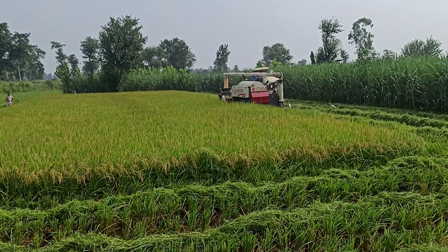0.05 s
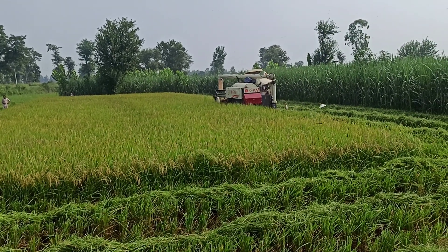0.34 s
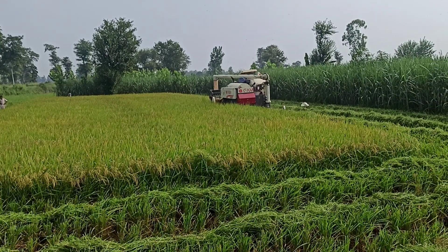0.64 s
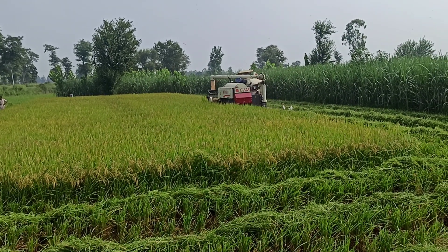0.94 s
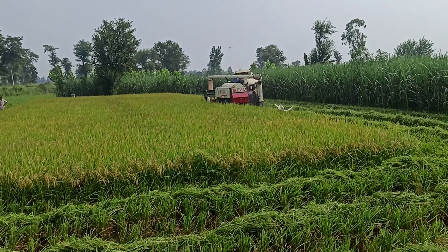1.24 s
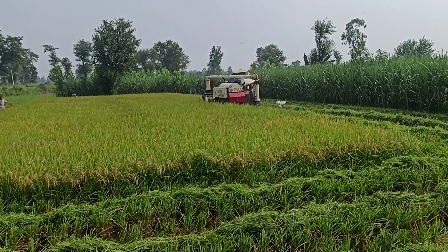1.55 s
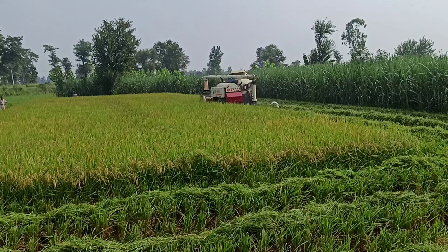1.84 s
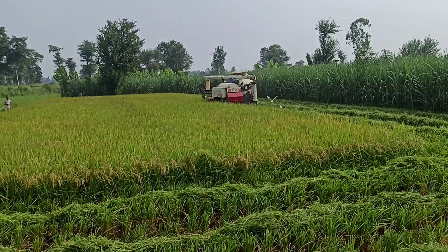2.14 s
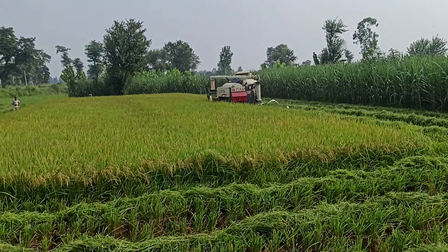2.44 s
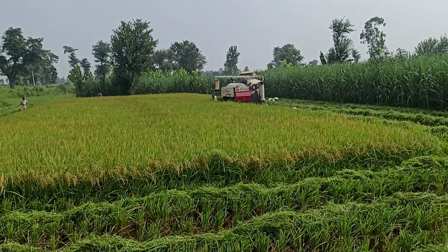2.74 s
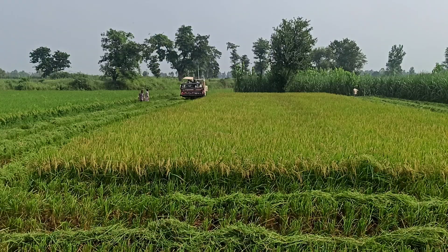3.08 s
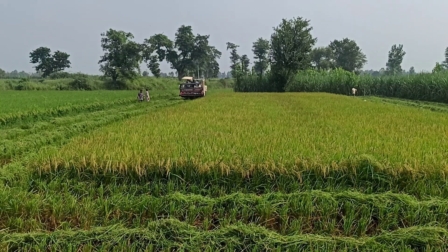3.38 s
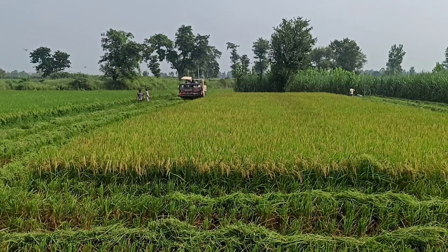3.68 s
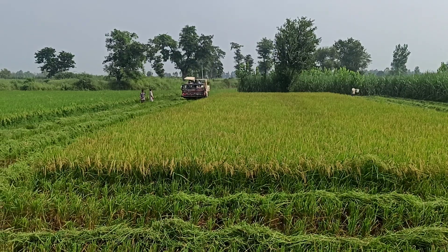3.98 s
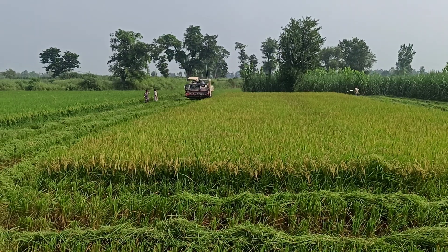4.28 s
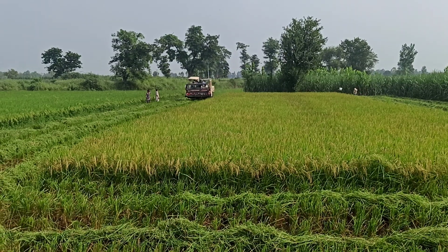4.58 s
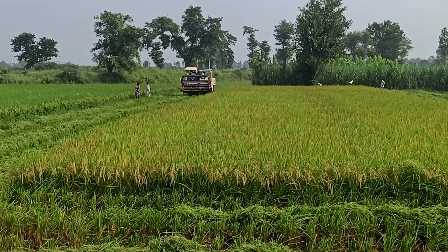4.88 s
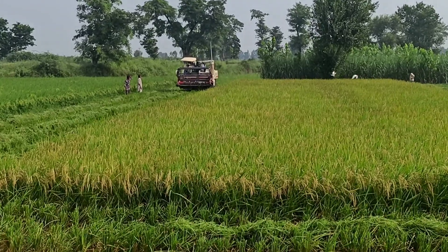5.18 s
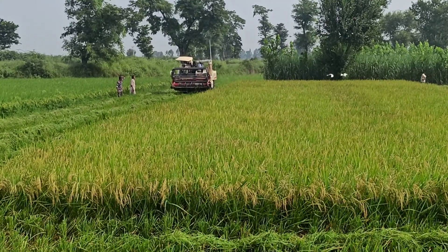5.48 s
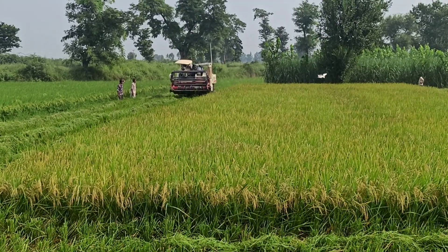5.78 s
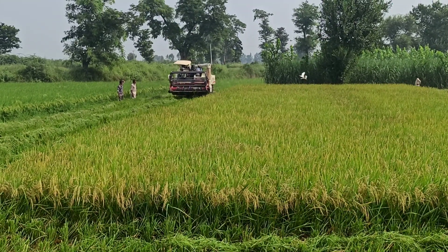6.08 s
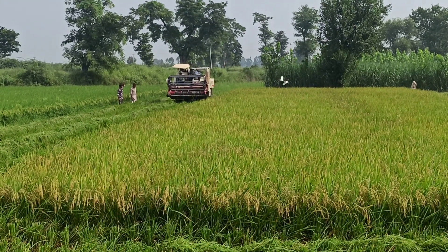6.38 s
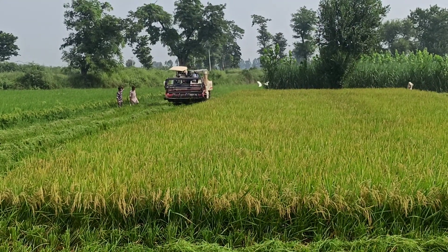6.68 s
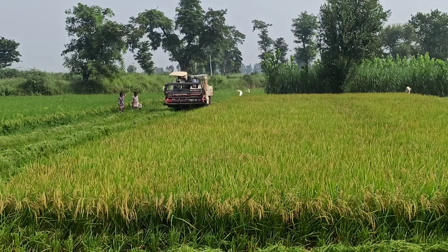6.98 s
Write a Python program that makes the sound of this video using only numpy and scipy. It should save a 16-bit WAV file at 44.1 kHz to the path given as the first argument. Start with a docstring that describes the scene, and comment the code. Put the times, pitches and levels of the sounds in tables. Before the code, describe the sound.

A combine harvester works in an open field, its diesel rumbling and booming under load while the threshing gear rattles and straw hisses. After nearly three seconds the sound switches abruptly to far behind the machine: a quieter, steady drone and hums over a duller rattle. Faint insects shrill and a bird gives two tiny chirps. The microphone picks up a few handling taps and a sharp knock at the end.

```python
"""Combine harvester in a rice field

Side-on, the laboring diesel rumbles and booms, the threshing gear rattles its panels and straw hisses.
Then, abruptly, we are far behind: a steady exhaust drone and shaft hums over a duller rattle, with
insects shrilling and two bird chirps. A thin sizzle lies on top; the microphone is handled and knocked."""
import sys
import numpy as np
from scipy import signal
from scipy.fft import rfft, irfft
from scipy.io import wavfile
from scipy.ndimage import map_coordinates

SR = 44100
rng = np.random.default_rng(int(sys.argv[2]) if len(sys.argv) > 2 else 0)


def materialize(psi):
    """Save the field psi as 16-bit PCM at rate SR to the path in sys.argv[1].

    A 1-D psi becomes a single channel; in a 2-D psi each row is a channel.
    """
    bounded = np.clip(np.atleast_2d(psi).T, -1, 1)
    quanta = np.round(bounded * 32767).astype(np.int16)
    wavfile.write(sys.argv[1], SR, quanta)


N = 314433
T = np.arange(N) / SR
FREQ = np.maximum(np.fft.rfftfreq(N, 1 / SR), 1)
BEHIND_S = 2.773  # the listener jumps from side-on (NEAR) to far behind (FAR)

# tone color of the exhaust rumble: freq_hz, gain_db
NEAR_EXHAUST_EQ = [(20, -44), (48, -51), (62, -23.5), (80, -4.5), (100, -5), (123, 2), (160, -2.5),
                   (225, -1), (300, -4.5), (360, -16.5), (600, -88)]
FAR_EXHAUST_EQ = [(20, -38), (45, -23), (65, -12.5), (85, -5.5), (120, 5), (160, 4), (188, 6), (210, 1.5),
                  (265, 0), (295, -6.5), (370, -14), (600, -80)]
# tone color of the threshing rattle: freq_hz, gain_db
NEAR_RATTLE_EQ = [(230, -25), (370, -2), (500, -6.5), (700, 0.5), (900, -1.5), (1080, -8.5), (1380, -1.5),
                  (1600, -5.5), (1900, -11.5), (2200, -12), (3200, -105)]
FAR_RATTLE_EQ = [(230, -24.5), (380, -9), (520, -8.5), (660, 0.5), (760, 0.5), (870, -2.5), (960, -11.5),
                 (1100, -14.5), (1450, -10), (1700, -16.5), (2000, -17.5), (2300, -23.5), (3200, -80)]
# tone color of the straw hiss: freq_hz, gain_db
NEAR_STRAW_EQ = [(1500, -30), (2250, 2.5), (3200, 0.5), (4700, -0.5), (4870, -8), (5950, -6), (6250, 3),
                 (7620, 6), (7780, -2), (8480, -3), (8750, -42), (10000, -90)]
FAR_STRAW_EQ = [(1500, -40), (2250, -9), (2750, -0.5), (3200, 0), (4650, 2), (4800, -8.5), (6050, -10),
                (6180, -6.5), (7700, -1.5), (8400, -8.5), (8800, -37), (10000, -66)]
# tone color of the thin top: freq_hz, gain_db
NEAR_SIZZLE_EQ = [(11350, -64), (11650, -7), (12700, -10), (13500, 2.5), (14020, -0.5), (14150, 8),
                  (14300, -1), (14750, -2), (14890, 1), (15100, -8), (15800, -14)]
FAR_SIZZLE_EQ = [(11350, -55), (11650, -3), (12700, -4), (13400, 2), (14300, -6), (15800, -9.5)]
# the exhaust pipe's two low resonances under load: freq_hz, gain_db
BOOM_EQ = [(60, -34), (95, -9), (116, -1.5), (132, -3), (160, -9.5), (200, -9.5), (228, -0.5), (262, -19),
           (305, -11.5), (345, -37), (600, -87)]
# panel and duct resonances: center_hz, width_hz, lift_db
NEAR_RESONANCES = [(358, 23, -6.5), (412, 81, 8), (552, 77, 5), (596, 22, -4), (675, 88, 1.5),
                   (780, 20, -11), (954, 64, 8), (1133, 36, 6.5), (1395, 62, 2), (1533, 110, -6),
                   (1798, 64, 5), (1954, 45, 7), (2096, 83, -7), (2465, 130, 3.5), (2530, 64, -5.5),
                   (2730, 80, 4.5), (3230, 270, 5.5), (6780, 340, 1.5)]
FAR_RESONANCES = [(391, 55, -5), (601, 12, -5), (1270, 130, 3.5), (1536, 45, 6), (1932, 180, 6.5),
                  (2360, 160, 6), (2710, 140, -3.5), (3144, 66, 4.5), (3730, 200, 2.5), (4490, 81, 4),
                  (6120, 110, 5), (7850, 200, -11), (8700, 710, 7.5)]
# share of the sound scattered by crop and trees, different at each ear: freq_hz, share_db
NEAR_DIFFUSION = [(100, -29), (220, -20), (450, -14), (900, -8), (2000, -4), (4500, -3.5), (8000, -2)]
FAR_DIFFUSION = [(100, -29), (280, -17), (420, -5), (700, -16), (1080, -5), (1300, -10), (1800, -3),
                 (3500, -5.5), (8000, -2.5)]
# where each band leans in the stereo image: freq_hz, left_minus_right_db
NEAR_PAN = [(300, -.3), (420, 1.7), (720, 0), (920, 4), (1150, -2.5), (1310, 5), (1500, .5), (1780, 8),
            (1950, -2), (2100, 2.5), (2400, 2), (2900, -3), (4200, -6), (5100, 0), (7500, -4), (8400, -9)]
FAR_PAN = [(340, -.5), (480, 2.3), (900, -1), (1180, 4), (1550, -4.5), (1800, 7.5), (2050, 0), (2450, 2),
           (3000, -2.5), (3600, -3.5), (5000, 0), (6000, 1.5), (8000, .5)]
# nearby reflections spread the bands from side to side: freq_hz, left_lead_rad
NEAR_PHASE = [(750, 0), (1450, -.3), (1580, -2.4), (1720, -.1), (1870, -1.5), (2000, -.4), (2120, 2.2),
              (2400, -.2), (2600, -2.2), (2800, -1.5), (3400, -1.5), (3620, -2.4), (3850, 0), (4700, 0),
              (6100, -1.6), (6500, -.5), (8000, -2.2)]
FAR_PHASE = [(300, 0), (430, .4), (650, .1), (1000, .9), (1200, .2), (1450, .4), (1750, 2.7), (1880, 0),
             (2080, .5), (2250, 2.9), (2500, .3), (2760, 2.9), (3100, 0), (4000, 1), (5000, .8), (8000, 2)]
# surges of engine load: middle_s, length_s, boom_gain, rattle_lift_db
LOAD_SURGES = [(.38, .16, 0.47, 1.5), (.51, .14, 1, -0.5), (.73, 0.22, 0.1, 0), (1.42, 0.085, 0.44, 0.5),
               (2.18, 0.44, 0.87, 1.9), (2.56, 0.51, 0.86, 1.3)]
# swells of the hiss and its thin top: middle_s, length_s, straw_lift_db, sizzle_lift_db
HISS_LIFTS = [(.52, 0.61, 2, 2.5), (.83, 0.45, 1.1, 5.5), (1.45, 0.88, 0.6, 3.5), (2.66, 0.39, 0.1, 5),
              (3.27, 0.45, 0.5, 4), (4.0, 0.48, 1, 2), (6.5, 0.42, 1, 5), (6.9, 1.6, 3.5, -1),
              (6.96, .2, 0, 6)]
# gusts on the microphone: middle_s, length_s, lift_db
WIND_GUSTS = [(1.15, .7, 14), (2.4, 1.3, 21)]
# bright finger scratches on the case: start_s, left_db, right_db
CASE_SCRATCHES = [(2.3437, -32, -11.5), (2.653, -46, -21), (4.111, -30, -43), (6.428, -40, -38),
                  (6.9416, -21, -45), (6.9479, -25, -48), (6.9894, -26, -37), (6.9965, -32, -45)]
# ring of each microphone port: freq_hz, gain_db
LEFT_PORT_EQ = [(1500, -18), (3700, 0), (5200, -15), (7400, 6), (8400, 0), (9400, -34), (13000, -19),
                (15700, -26)]
RIGHT_PORT_EQ = [(3000, -25), (6000, -15), (7600, -6), (8500, -6), (9500, -36), (11200, -36), (12000, -11),
                 (13900, 6), (15700, -10.5)]
# partials of the exhaust drone: firing_multiple, start_db, waver_db, rise_db_per_s
DRONE_PARTIALS = [(1, -35, 1.5, 0.42), (2, -36.5, 2, 0.8)]
# hums of shafts, drum and fan: pitch_hz, relative_db, waver_db, speed_jitter_ratio
SHAFT_HUMS = [(81.2, -42.5, 2, 0.0038), (277.3, -50.5, 3, 0.0018), (335.6, -44, 1.5, 0.00402),
              (482, -60, -1, .003), (566, -52, 3.5, 0.00297), (634.5, -50.5, -1, 0.0035),
              (674, -49, 1.5, 0.00274), (743.4, -45.5, 4.5, 0.00406), (779, -50, 0, 0.00391)]
# from behind, rattle and hums come through more clearly: middle_s, length_s, lift_db
CLEAR_SPELLS = [(3.25, 0.96, 1), (4.61, 0.19, 2.5), (6.8, 2.1, 1)]
# insects in the crop: start_s, end_s, pitch_hz, width_hz, level_db
INSECT_CALLS = [(2.3, 4.3, 6580, 160, -54.5), (3.3, 5.4, 7630, 180, -58), (3, 6.1, 8240, 260, -54),
                (5.4, 6.4, 6900, 350, -53), (6.24, 7.5, 6560, 400, -48.5)]
# dull taps on the case: start_s, peak_db, ring_hz, rise_ms, left_minus_right_db
CASE_TAPS = [(3.928, -21, 298, 1.3, 21), (5.3438, -14, 480, 0.68, 24), (5.878, -23, 774, 1.5, 4),
             (6.431, -21, 420, .8, 12), (6.944, -16.5, 418.3, 0.85, 19)]
# faint bird chirps: middle_s, start_hz, end_hz, length_s, level_db
BIRD_CHIRPS = [(5.999, 2610, 2470, 0.048, -44.5), (6.113, 6200, 6240, 0.047, -49)]


def amp(db):
    """Decibels to gain."""
    return np.exp(np.asarray(db) * (np.log(10) / 20))


def unit(x):
    """Scale to rms 1; a stereo pair is judged by its middle."""
    return x / np.std(np.atleast_2d(x).mean(axis=0))


def over_freq(points):
    """A curve through (freq_hz, value) points on a log-frequency axis."""
    hz, values = np.transpose(points)
    return np.interp(np.log(FREQ), np.log(hz), values)


def walk(rate_hz):
    """Smooth random drift with a spread of about 1."""
    knots = rng.standard_normal(1024)
    place = np.linspace(0, rate_hz * N / SR, 4096)
    coarse = map_coordinates(knots, [place], order=3, mode="wrap")
    return np.interp(T, np.linspace(0, T[-1], len(coarse)), coarse)


def turns_of(hz):
    """Cycles completed at a moving rate."""
    return np.cumsum(hz) / SR


def swells(table):
    """Smooth bumps from rows (middle_s, length_s, lifts...): one curve per lift column."""
    return sum(np.outer(lifts, np.cos(np.pi * np.clip((T - middle_s) / length_s, -.5, .5)) ** 2)
               for middle_s, length_s, *lifts in table)


def tone(turns, db, waver_db):
    """A sine whose level wavers in the moving air."""
    gust = walk(11)
    return np.sin(2 * np.pi * (turns + rng.random())) * amp(db + waver_db * np.minimum(gust, np.tanh(gust)))


def patter(hits_per_s, spread_db, share):
    """Small uneven impacts carry a share of the power; a smooth rush carries the rest."""
    hits = (rng.random(N) < hits_per_s / SR) * rng.choice([-1, 1], N)
    sizes = amp(spread_db * np.minimum(rng.exponential(size=N), 4))
    return np.sqrt(share) * unit(hits * sizes) + np.sqrt(1 - share) * rng.standard_normal(N)


def viewpoint(resonances, diffusion, pan, phase):
    """The color and stereo image one listening place gives the machine."""
    panels_db = sum(db / (1 + (2 * (FREQ - hz) / width) ** 2) for hz, width, db in resonances)
    return panels_db, over_freq(diffusion), over_freq(pan), over_freq(phase)


def radiate(drive, eq, view):
    """Color a drive and bring it to both ears: a direct path plus scatter from all round."""
    panels_db, scatter_db, pan_db, lead_rad = view
    scatter = np.minimum(amp(scatter_db), 1)
    sides = np.array([[1], [-1]]) / 2
    direct = rfft(drive) * np.exp(1j * sides * lead_rad)
    both = np.sqrt(1 - scatter ** 2) * direct + scatter * rfft(rng.standard_normal((2, N)))
    return unit(irfft(both * amp(over_freq(eq) + panels_db + sides * pan_db), N))


def exhaust(firing, eq, view, rough_db, gas):
    """Diesel rumble: one puff per firing, each of its own strength, in turbulent gas."""
    puffs = np.diff(firing.astype(int), prepend=0) * rng.uniform(-1, 1, N)
    flow = unit(puffs) + gas * rng.standard_normal(N)
    return radiate(flow * amp(rough_db * walk(11)), eq, view)


def thresher_rattle(impacts, firing, eq, view, pulse):
    """Threshing impacts ring the panels, pulsing with the engine."""
    return radiate(impacts, eq, view) * (1 + pulse * np.cos(2 * np.pi * firing))


def panel_wobble(stereo, lag_ms):
    """Shaking panels do not hold their pitch: a moving delay bends every resonance a little."""
    place = np.arange(N) - SR * lag_ms / 1000 * walk(7)
    return np.array([map_coordinates(ear, [place], order=3, mode="mirror") for ear in stereo])


def gear_whine(db, pitch_hz=955):
    """The threshing gear sings through the rattle, its pitch unsteady."""
    return tone(turns_of(pitch_hz * (1 + .01725 * walk(30))), db, waver_db=3)


def straw_hiss(eq, view, spread_db, lag_ms, drift, echo):
    """Countless stalks tick; their echo off the ground drifts, so bands of the hiss slide about."""
    stalks = patter(3000, spread_db, share=.31)
    lag = SR * lag_ms / 1000 * (1 + drift * walk(.7))
    bounce = map_coordinates(stalks, [np.arange(N) - lag], order=1, mode="wrap")
    return radiate(stalks + echo * bounce, eq, view)


def sizzle(eq, db, flicker_db, pan_db, crackle):
    """A thin, flickering top with a fine crackle; negative pan leans right."""
    grit = [patter(1100, spread_db=3, share=crackle) for _ in range(2)]
    fizz = irfft(rfft(grit) * amp(over_freq(eq)), N)
    pan = amp(np.array([[pan_db], [-pan_db]]) / 2)
    return unit(fizz * pan) * amp(db + flicker_db * walk(170))


def pipe_boom(firing, view, pitch_hz=123):
    """Under load the exhaust pipe booms, its deepest note unsteady."""
    body = exhaust(firing, BOOM_EQ, view, rough_db=.5, gas=.78) * amp(-24)
    return body + tone(turns_of(pitch_hz * (1 + .071 * walk(24.02))), db=-21, waver_db=3)


def wind():
    """Gusts lightly buffet the microphone, alike on both sides."""
    buffet = signal.sosfilt(signal.butter(3, 55, fs=SR, output="sos"), rng.standard_normal(N))
    return unit(buffet) * amp(-71 + swells(WIND_GUSTS)[0])


def side_on(firing_hz=88):
    """Close and under load; rattle and hiss fade as the machine draws away."""
    surge, rattle_lift_db = swells(LOAD_SURGES)
    straw_lift_db, sizzle_lift_db = swells(HISS_LIFTS)
    view = viewpoint(NEAR_RESONANCES, NEAR_DIFFUSION, NEAR_PAN, NEAR_PHASE)
    firing = turns_of(firing_hz * (1 + .03 * walk(5)))
    rumble = exhaust(firing, NEAR_EXHAUST_EQ, view, rough_db=-1.5, gas=1.32) * amp(-25.5)
    boom = pipe_boom(firing, view) * surge
    thresher_db = -26.5 - 1.21 * T + rattle_lift_db
    impacts = patter(650, spread_db=2.5, share=.48)
    rattle = thresher_rattle(impacts, firing, NEAR_RATTLE_EQ, view, pulse=.056)
    rattle = panel_wobble(rattle * amp(thresher_db + .38 * walk(14.5)), lag_ms=.5)
    gear = gear_whine(thresher_db - 12)
    hiss_db = .48 * walk(21.67) - .32 * T  # uneven wads of crop move the hiss and its top together
    straw = straw_hiss(NEAR_STRAW_EQ, view, spread_db=6.5, lag_ms=2.4, drift=.034, echo=.54)
    straw = panel_wobble(straw * amp(-36 + straw_lift_db + hiss_db), lag_ms=.3)
    top = sizzle(NEAR_SIZZLE_EQ, -48.5 + sizzle_lift_db + hiss_db, flicker_db=2.2, pan_db=-14, crackle=.45)
    return rumble + boom + rattle + gear + straw + top + wind()


def scratches(decay_ms=1.2):
    """Fingers scrape the case: brief bursts of grit ring each microphone port."""
    ears = []
    for side, port_eq in enumerate((LEFT_PORT_EQ, RIGHT_PORT_EQ)):
        touch = sum(amp(levels_db[side]) * (T >= start_s) * np.exp(-1000 * abs(T - start_s) / decay_ms)
                    for start_s, *levels_db in CASE_SCRATCHES)
        ring = amp(over_freq(port_eq))
        ring /= np.sqrt(np.mean(ring ** 2))
        ears.append(irfft(rfft(touch * rng.standard_normal(N)) * ring, N))
    return np.array(ears)


def exhaust_drone(firing, elapsed_s):
    """Steady firings blend into a low note and its octave, slowly growing."""
    return sum(tone(multiple * firing, db + rise * elapsed_s, waver_db)
               for multiple, db, waver_db, rise in DRONE_PARTIALS)


def shaft_hums(lift_db):
    """Shafts, drum and fan each hum at their own slightly unsteady speed."""
    return sum(tone(turns_of(hz * (1 + jitter * walk(9))), db + lift_db, waver_db)
               for hz, db, waver_db, jitter in SHAFT_HUMS)


def insects():
    """Narrow bands of shrilling swell and fade all over the field."""
    out = 0
    for start_s, end_s, hz, width_hz, db in INSECT_CALLS:
        band = 1 / (1 + (2 * (FREQ - hz) / width_hz) ** 4)
        shrill = irfft(rfft(rng.standard_normal((2, N))) * band, N)
        along = np.clip((T - start_s) / (end_s - start_s), 0, 1)
        out += shrill / shrill.std() * np.sqrt(np.sin(np.pi * along)) * amp(db + 2.3 * walk(13))
    return out


def from_behind(firing_hz=92.36):
    """Far off and slowly growing: the governed engine drones against the hums, over a duller rattle."""
    elapsed_s = np.maximum(T - BEHIND_S, 0)
    straw_lift_db, sizzle_lift_db = swells(HISS_LIFTS)
    clear_db, = swells(CLEAR_SPELLS)
    view = viewpoint(FAR_RESONANCES, FAR_DIFFUSION, FAR_PAN, FAR_PHASE)
    firing = turns_of(firing_hz * (1 + .004 * walk(12)))
    drone = exhaust_drone(firing, elapsed_s)
    hums = shaft_hums(clear_db)
    rumble = exhaust(firing, FAR_EXHAUST_EQ, view, rough_db=.8, gas=.92) * amp(-34)
    impacts = patter(900, spread_db=2, share=.22)
    rattle = thresher_rattle(impacts, firing, FAR_RATTLE_EQ, view, pulse=.06)
    rattle *= amp(-38.5 + clear_db + .5 * walk(11))
    straw = straw_hiss(FAR_STRAW_EQ, view, spread_db=2.5, lag_ms=1.543, drift=.069, echo=.35)
    straw *= amp(-43.5 - .6 * elapsed_s + straw_lift_db + .7 * walk(16))
    machine = (hums + rumble + rattle + straw) * amp(-1.5 + .5 * elapsed_s)
    top_db = -63.5 + sizzle_lift_db + 1.1 * walk(5.4)
    top = sizzle(FAR_SIZZLE_EQ, top_db, flicker_db=1.5, pan_db=-9, crackle=.15)
    return drone + machine + top + insects()


def taps():
    """Dull handling taps on the case, each swelling and ringing out within milliseconds."""
    out = 0
    for start_s, db, hz, rise_ms, pan_db in CASE_TAPS:
        age = T[(T >= start_s) & (T < start_s + .03)] - start_s
        swell = 1000 * age / rise_ms
        ring = amp(db) * np.sin(2 * np.pi * hz * age) * swell * np.exp(1 - swell)
        pan = amp(np.minimum([[pan_db], [-pan_db]], 0))
        out += pan * np.pad(ring, (int(start_s * SR), N))[:N]
    return out


def birds():
    """Short gliding whistles, far away and blurred by the air."""
    out, blur_hz = 0, 35 * walk(250)
    for middle_s, start_hz, end_hz, length_s, db in BIRD_CHIRPS:
        along = np.clip((T - middle_s) / length_s + .5, 0, 1)
        pitch_hz = start_hz + (end_hz - start_hz) * along + blur_hz
        out += amp(db) * np.sin(np.pi * along) * np.sin(2 * np.pi * turns_of(pitch_hz))
    return out


def knock(start_s=6.9765, peak_db=-4.2, ring_hz=440, decay_ms=.88):
    """A sharp rap on the left microphone port: a spike and one damped swing back."""
    age = np.clip(T - start_s, 0, .05)
    swing = (T >= start_s) * np.cos(2 * np.pi * ring_hz * age + .9) * np.exp(-1000 * age / decay_ms)
    swing = signal.sosfilt(signal.butter(2, [70, 5400], "band", fs=SR, output="sos"), swing)
    return np.array([[1], [0]]) * amp(peak_db) * swing / np.abs(swing).max()


def scene():
    """Side-on snaps to far behind in 2 ms; birds and handling noises lie over the top."""
    behind = np.clip((T - BEHIND_S) / .002, 0, 1)
    harvester = (1 - behind) * side_on() + behind * from_behind()
    return harvester + birds() + taps() + scratches() + knock()


def record(dry):
    """A steep low-pass shaves off the air above 15.7 kHz."""
    return signal.sosfilt(signal.ellip(10, .1, 80, 15700, fs=SR, output="sos"), dry)


dry = scene()
out = record(dry)
materialize(out)
```